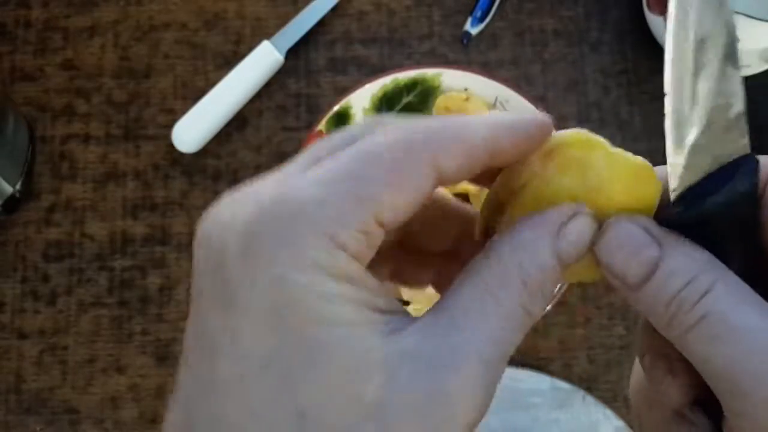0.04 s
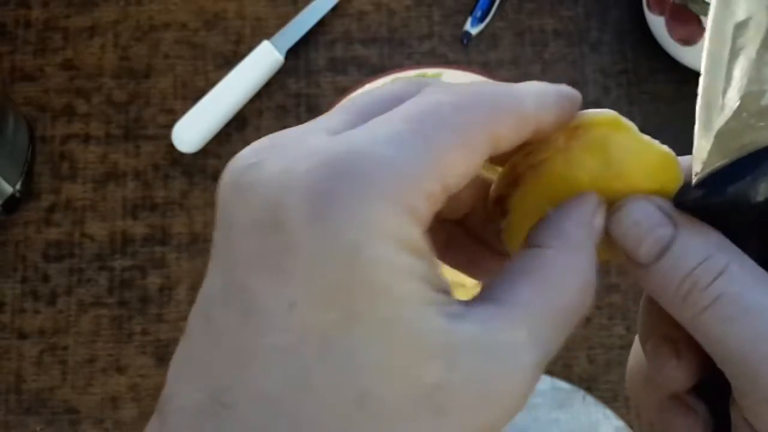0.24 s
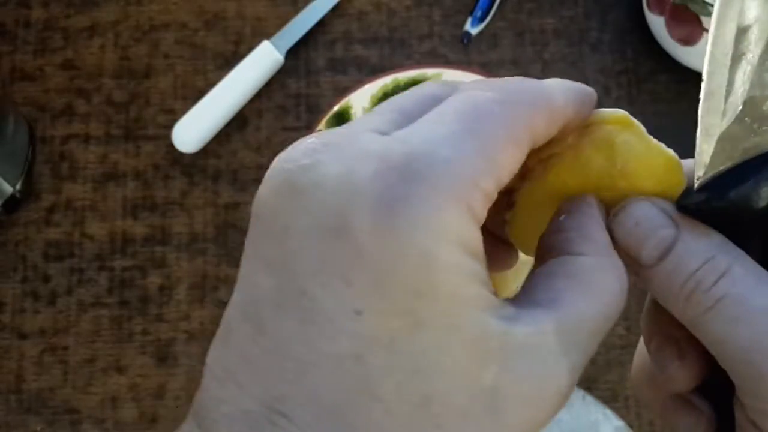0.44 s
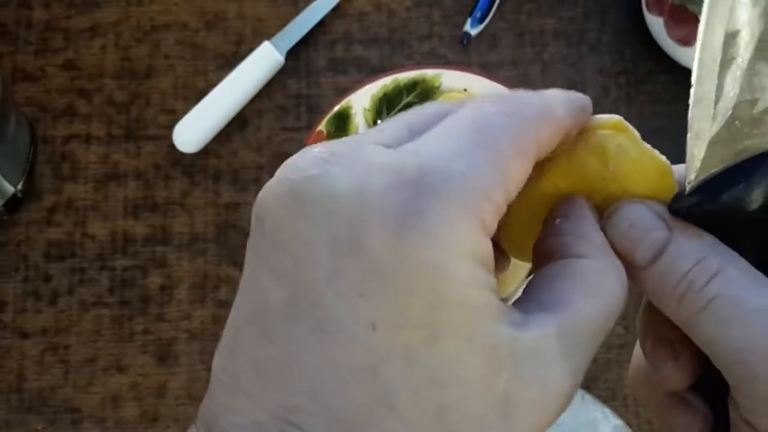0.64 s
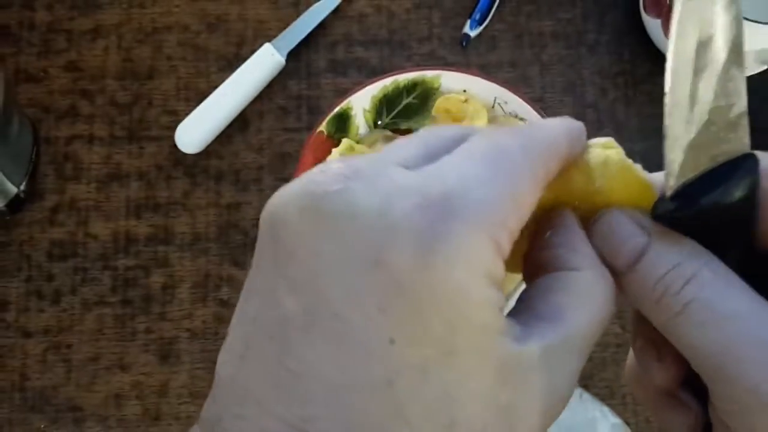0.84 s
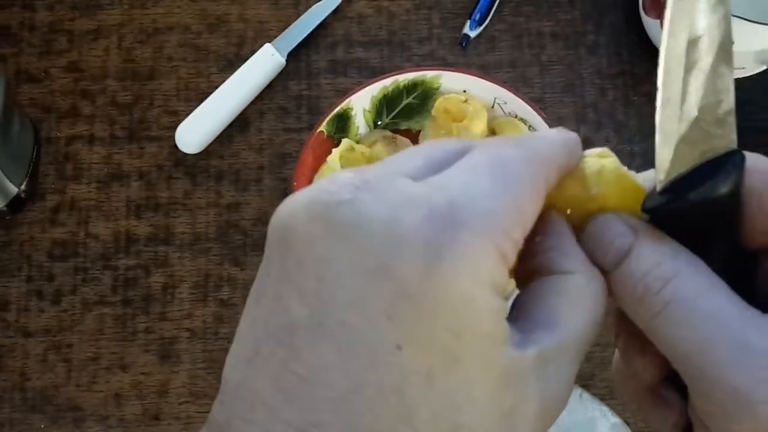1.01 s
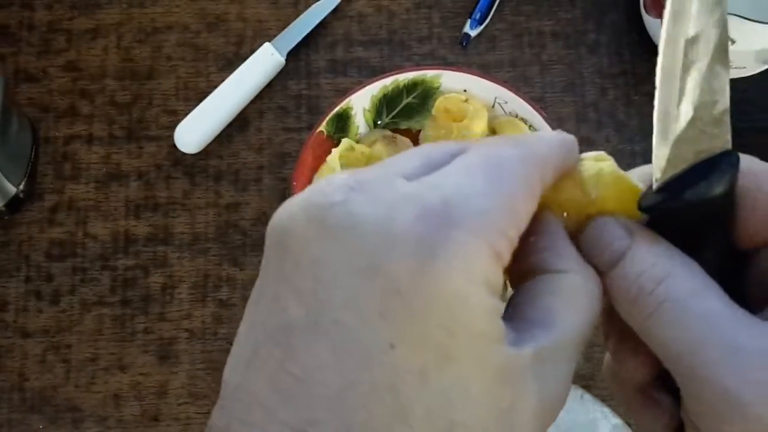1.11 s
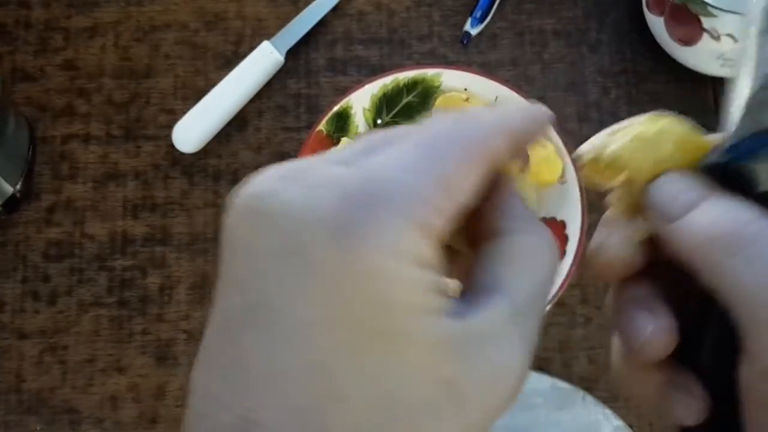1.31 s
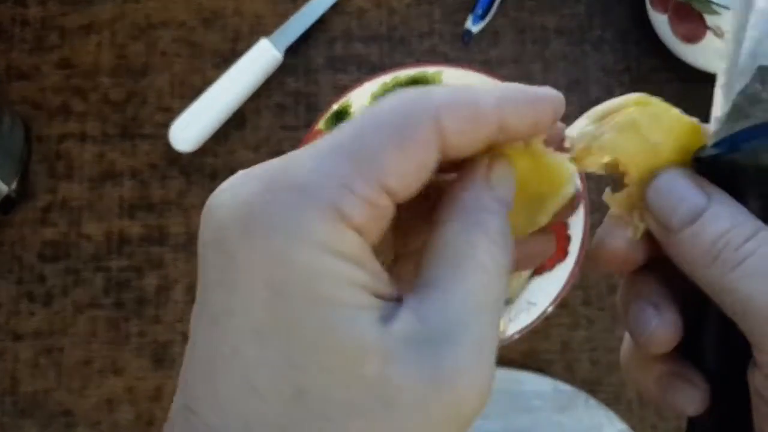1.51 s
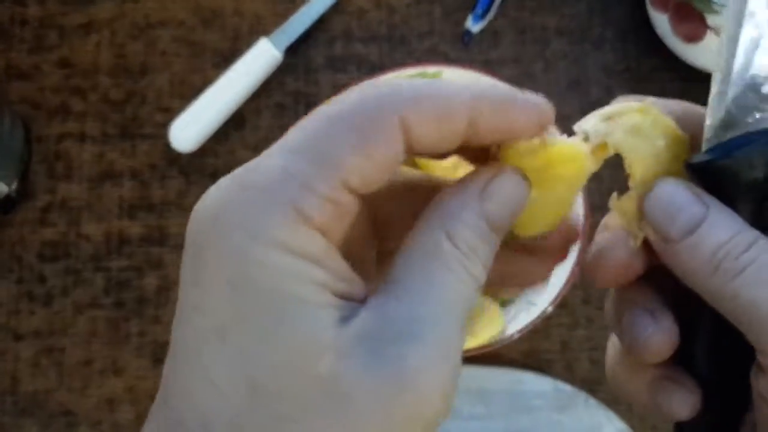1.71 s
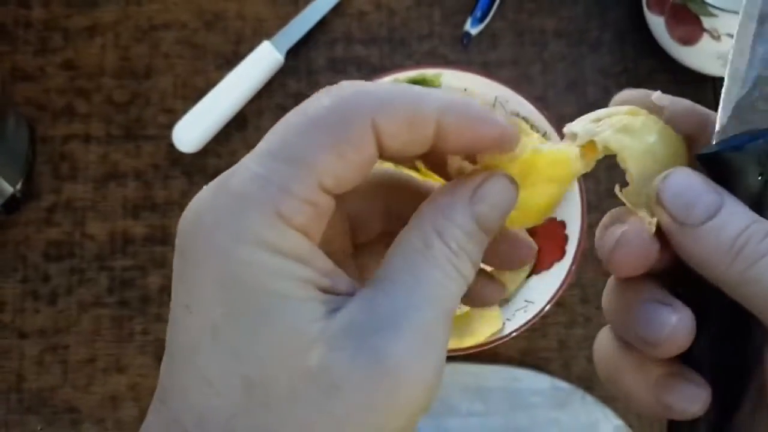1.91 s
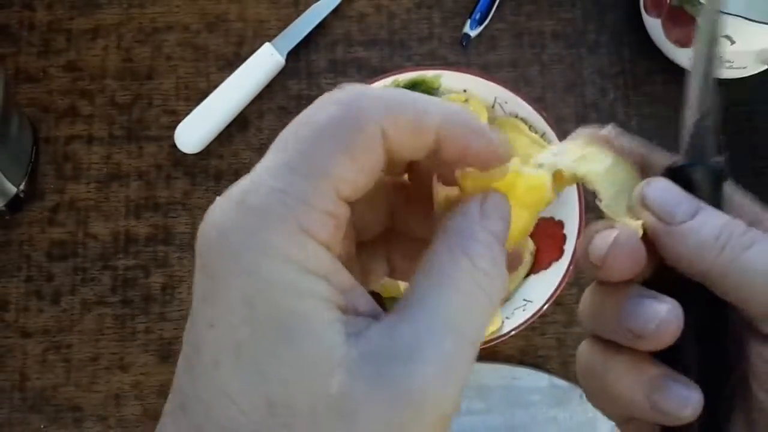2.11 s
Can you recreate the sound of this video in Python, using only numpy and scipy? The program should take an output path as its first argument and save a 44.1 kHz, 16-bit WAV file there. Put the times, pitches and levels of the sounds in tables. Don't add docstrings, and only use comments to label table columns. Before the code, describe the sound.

Close, dry crunching of a hard fried chip pulled apart in the fingers at a table; small snaps quicken into sharp cracks, then fade to faint ticking, with quiet low room hum throughout.

```python
import sys
import numpy as np
from scipy import signal
from scipy.fft import rfft, irfft, next_fast_len
from scipy.io import wavfile

SR = 44100
rng = np.random.default_rng(int(sys.argv[2]) if len(sys.argv) > 2 else 0)


def convert_level_to_amplitude(level_db):
    exponent = np.asarray(level_db, float) / 20
    return 10 ** exponent


def unload_wav(signal):
    wavfile.write(
        sys.argv[1],
        SR,
        np.round(np.clip(np.atleast_2d(signal).T, -1, 1) * 32767).astype(np.int16),
    )


N = 94815

# edge, body, shell, splinter (level [dB])
PART_DB = [-0.56, -1.8, -1.27, 0.01]
PORTS_ALIKE = [.4, 1, 0.57, 0.067]


def unit(x):
    return x / np.sqrt(np.mean(np.abs(x) ** 2) + 1e-20)


def along(points, hz):
    f, v = np.transpose(points)
    return np.interp(np.log(hz + 1), np.log(f + 1), v)


def filtered(x, response):
    m = next_fast_len(N + SR // 2)
    return irfft(rfft(x, m) * response(np.fft.rfftfreq(m, 1 / SR)), m)[..., :N]


def rush(gain_db):
    # (frequency [Hz], correlation [0-1])
    coherence = [(25, 0.8), (70, 1), (180, 0.91), (550, 0.66), (1100, 0.37), (2200, 0.1), (4970, 0.1),
                 (15000, 0.05)]

    def mid_side(hz):
        angle = np.arccos(np.clip(along(coherence, hz), -1, 1)) / 2
        return convert_level_to_amplitude(gain_db(hz)) * [np.cos(angle), np.sin(angle)]

    mid, side = filtered(rng.standard_normal((2, N)), mid_side)
    return unit(np.array([mid + side, mid - side]))


def room_tone():
    hum_db, hiss_db = -45.5, -62.5
    # (frequency [Hz], density [dB per Hz])
    hum_spectrum = [(15, -56), (25, -30.5), (129, -2), (220, -9), (266, -10.5), (368, -11.5), (460, -15.5),
                    (852, -13.5), (1500, -18.5), (1950, -53), (3300, -120)]
    # (frequency [Hz], width [Hz], lift [dB])
    modes = [(84.6, 21, 11), (133, 8.6, 9.5), (286, 21, 7), (391.4, 109, 8.5), (862, 63, 4.5)]
    # (frequency [Hz], density [dB per Hz])
    hiss_spectrum = [(710, -14.5), (1200, -11), (1840, -6.5), (2420, -16), (2980, -13.5), (3600, -33),
                     (6000, -43), (10400, -26), (14800, -30), (16500, -50)]

    def hum_gain(hz):
        lift = sum(db / (1 + (2 * (hz - c) / w) ** 2) for c, w, db in modes)
        return along(hum_spectrum, hz) + lift

    hum = rush(hum_gain)
    hiss = rush(lambda hz: along(hiss_spectrum, hz))
    return convert_level_to_amplitude(hum_db) * hum + convert_level_to_amplitude(hiss_db) * hiss


def room(x):
    gap_s, step = 0.0032, SR // 8
    # (frequency [Hz], fall by 60 dB [s])
    decay_t60 = [(500, 0.046), (2500, 0.33), (8000, 0.36), (15000, 0.27)]
    out = np.zeros((2, N + 2 * SR))
    for a in range(0, N, step):
        hz, t, z = signal.stft(rng.standard_normal((2, SR // 3)), SR, nperseg=256)
        decay = convert_level_to_amplitude(-60 * t / along(decay_t60, hz)[:, None])
        tail = signal.istft(z * decay, SR, nperseg=256)[1]
        wet = signal.fftconvolve(x[None, a:a + step], tail / np.linalg.norm(tail[0]), axes=1)
        b = a + round(gap_s * SR)
        out[:, b:b + wet.shape[1]] += wet
    return out[:, :N]


def table_echo(x):
    delay_s, echo_db = 0.0027, -12
    delayed = np.pad(x[::-1], ((0, 0), (round(delay_s * SR), 0)))
    return convert_level_to_amplitude(echo_db) * delayed[:, :N]


def resonant(x, peaks):
    def one(f, c, w):
        return 1j * f * w / (c * c - f * f + 1j * f * w)

    def response(f):
        total = 0
        for k, (c, w, db) in enumerate(peaks):
            sign = (-1) ** k
            total = total + sign * convert_level_to_amplitude(db) * one(f, c, w) * one(f, c, 2 * w)
        return unit(total)

    return filtered(x, response)


def chip(shocks):
    # (frequency [Hz], width [Hz], level [dB])
    edge = [(8420, 1910, 2), (10110, 1360, -1.5)]
    # (frequency [Hz], width [Hz], level [dB])
    body = [(990, 195, -7.5), (1672, 520, -2.5), (2640, 580, 1.5)]
    # (frequency [Hz], width [Hz], level [dB])
    shell = [(3490, 1570, -3), (4700, 2450, 1.5)]
    # (frequency [Hz], width [Hz], level [dB])
    splinter = [(10960, 2400, 4), (14960, 3000, -2.5)]
    return sum(resonant(x, part) for x, part in zip(shocks, (edge, body, shell, splinter)))


def paired(alike, size):
    share = np.array(alike)[:, None, None]
    common = rng.standard_normal((4, 1, size))
    private = rng.standard_normal((4, 2, size))
    return np.sqrt(share) * common + np.sqrt(1 - share) * private


def flakes():
    cycles, size = 38, 3000
    wobble_rad, left_lead_rad = 0.027, 0.4
    # (time [s], pitch [Hz], level [dB])
    loose_flakes = [(0.2508, 1430, -31), (0.285, 1480, -33), (0.295, 1480, -31), (0.293, 2730, -50),
                    (0.3285, 5350, -50), (0.328, 2490, -40), (0.376, 2300, -33), (0.5324, 4350, -32),
                    (0.581, 4800, -25.5), (0.6296, 2510, -25), (0.7553, 2820, -29.5), (0.7925, 1566, -24),
                    (0.7924, 890, -40), (0.7914, 2930, -45), (0.794, 4300, -38), (0.8654, 2830, -21),
                    (0.8654, 2433, -26), (0.9053, 3440, -20), (0.906, 1460, -27.5), (1.0383, 3680, -22),
                    (1.1239, 2850, -38), (1.121, 1750, -33.5), (1.217, 4450, -34), (1.244, 4430, -38),
                    (1.3062, 4700, -28), (1.3039, 2870, -27.5), (1.303, 1560, -37), (1.331, 4130, -32),
                    (1.331, 3020, -25), (1.432, 4672, -42), (1.654, 1227, -38.5), (1.9226, 2170, -44)]
    out, t = np.zeros((2, N + size)), np.arange(size) / SR
    for s, hz, db in loose_flakes:
        phase = np.cumsum(wobble_rad * rng.standard_normal(size)) + [[left_lead_rad], [0]]
        envelope = convert_level_to_amplitude(db - 60 * t * hz / cycles)
        start = round(s * SR)
        out[:, start:start + size] += envelope * np.sin(2 * np.pi * hz * t + phase)
    return out[:, :N]


def crackle(rows):
    shower_db, shower_t60_s = -8.5, 0.071
    cracks_per_s, spread_db, crack_s = 2600, 2.5, 0.0006
    looser = 0.78
    # (time [s], level [dB])
    pressure = [(0.0, -55.5), (0.19, -76), (0.25, -30), (0.4, -37), (0.45, -47), (0.65, -36), (0.87, -42.5),
                (1.04, -37), (1.19, -43), (1.262, -67), (1.42, -47.5), (2.03, -58.5), (2.15, -58)]
    # edge, body, shell, splinter (level [dB])
    press_db = [-8.5, -19, -19.5, -12.5]
    t = np.arange(N) / SR
    power = np.zeros((4, N))
    for s, db, *shares in rows:
        power[:, round(s * SR)] += convert_level_to_amplitude(db + shower_db + np.add([0, *shares], PART_DB)) ** 2
    decay = convert_level_to_amplitude(-120 * t[None, :SR // 3] / shower_t60_s)
    power = np.abs(signal.fftconvolve(power, decay, axes=1)[:, :N])
    s, db = np.transpose(pressure)
    power += convert_level_to_amplitude(np.interp(t, s, db) + np.array(press_db)[:, None]) ** 2

    happens = rng.random(N) < cracks_per_s / SR
    sizes = happens * convert_level_to_amplitude(spread_db * np.minimum(rng.exponential(1, N), 3))
    cracks = unit(signal.lfilter([1], [1, -np.exp(-1 / (crack_s * SR))], sizes))
    noise = paired(looser * np.array(PORTS_ALIKE), size=N)
    return chip((np.sqrt(power) * cracks)[:, None] * noise)


def snaps(rows):
    snap_db, snap_t60_s, pan_db, size = 16, 0.0035, 1.5, 512
    clean_share = 0.75
    t = np.arange(size) / SR
    shocks = np.zeros((4, 2, N + size))
    for s, db, *shares in rows:
        burst = paired(PORTS_ALIKE, size=size) * convert_level_to_amplitude(-60 * t / snap_t60_s)
        burst /= np.linalg.norm(burst, axis=2, keepdims=True)
        burst *= np.sqrt(1 - clean_share)
        burst[:, [0, 1], [0, rng.integers(0, 2)]] += np.sqrt(clean_share)
        level = convert_level_to_amplitude(db + snap_db + np.add([0, *shares], PART_DB))
        pan = convert_level_to_amplitude(rng.normal(0, pan_db) * np.array([0.5, -0.5]))
        gain = level[:, None] * pan
        start = round(s * SR)
        shocks[..., start:start + size] += burst * gain[..., None]
    return chip(shocks[..., :N])


def scene():
    room_db, left_db = -2.5, 0.63
    # (time [s], edge level [dB], body [dB], shell [dB], splinter [dB])
    bending = [(0.0009, -59.5, 18.5, -13, -9), (0.1127, -46.5, -14, -31, 2), (0.1382, -46.5, -22, -9, 8),
               (0.1701, -48.5, -8, -16, 2), (0.2265, -57, 3, -20, 3), (0.2318, -34, -21, -13, 8),
               (0.2373, -29, -7, -25, -16), (0.2497, -22.5, -15, -26, 3), (0.2551, -23.5, -15, -17, 3.5),
               (0.2738, -29.5, -8.5, -14, 0), (0.284, -28, -2, -9, 6.5), (0.2943, -22, -7.5, -8, -2),
               (0.3285, -25.5, 0.5, 8.5, 4), (0.3757, -36, 2.5, 5.5, 5.5), (0.4183, -32, -6, -8, -4),
               (0.4227, -17.5, -19.5, -10.5, -3), (0.4771, -32.5, -30, -11, 6.5),
               (0.5319, -28.5, -8, -4, -1), (0.5512, -37.5, -26, -21, 11), (0.58, -27, -14.5, 0.5, -1),
               (0.598, -37.5, -14, -17, 13), (0.6296, -23, -8.5, -9, -5.5), (0.6415, -21, -6.5, -3.5, -3),
               (0.6899, -35.5, -6, -1.5, 1), (0.7427, -53, -14, -17, -10), (0.7541, -25.5, -8, -9, -1)]
    # (time [s], edge level [dB], body [dB], shell [dB], splinter [dB])
    breaking = [(0.7915, -24, -2, -1.5, -3.5), (0.8181, -29.5, -4, -21, 1), (0.8543, -31, -10, -1, -8),
                (0.861, -30, -16, -8, -2), (0.8654, -18, -9, -11, -6), (0.874, -32, -21, 8, -12),
                (0.9055, -15.5, -7, -10, -2.5), (0.9098, -10.5, -39, -14.5, -3.5),
                (0.9075, -20, -16, -17, -20), (0.918, -19.5, -29, -9, -11), (0.9262, -20, -24, -3, -5),
                (0.9353, -18.5, -20, -7.5, -15), (0.9409, -22, -14, 3.5, 5), (1.0157, -26, -16, -6, 2),
                (1.0302, -21, -14.5, -3, 6), (1.0383, -21, -30, -6, -15), (1.0505, -49, -12, -13, 27),
                (1.0779, -21.5, -43, -11, -0.5), (1.0757, -28, -37, -12, 4.5), (1.1218, -17, -12, -7.5, -1),
                (1.1263, -26, -28, -12, -7), (1.131, -13, -29, -15, -4.5), (1.2046, -24.5, -20, -4, 1),
                (1.2067, -23.5, -13, -3.5, 2), (1.2191, -22, -14.5, -8.5, -5), (1.2457, -27, -16, -0.5, -3),
                (1.256, -19, -26, -14, -5), (1.2878, -34, -27, -23, -4), (1.296, -24, -17, -9, 3),
                (1.3043, -12.5, -22, -6, -9.5), (1.3147, -25, -32, -26, -7), (1.3248, -17, -17.5, -6.5, -2)]
    # (time [s], edge level [dB], body [dB], shell [dB], splinter [dB])
    crumbs = [(1.3267, -19, -11, -10, -13), (1.332, -14, -18, -9.5, -13), (1.34, -36, -28, -20, -7),
              (1.3598, -18.5, -11.5, -13.5, -7), (1.3653, -24, -13, -3, -2), (1.3936, -35.5, -11, -9, 4),
              (1.429, -34.5, -31, 1, -0.5), (1.5182, -34, -12, -8.5, -1), (1.523, -42.5, -6, -4, -10),
              (1.5619, -36, -15, -19, -13), (1.5663, -40.5, -20, -8, -3), (1.5734, -45, -20, -11, -6),
              (1.5677, -41, -29, -10, -4), (1.6138, -42, -4, -12, -2), (1.6209, -40, -15, -7, 0),
              (1.626, -37.5, -21, -17, -13), (1.6397, -43, -20, -15, -8), (1.6474, -44, -25, -17, -6),
              (1.654, -36.5, -9.5, -5.5, 0), (1.7125, -37.5, -7, -14, 5), (1.7204, -37.5, -17, -7, 3),
              (1.7473, -38, -29, -19, -12), (1.7613, -43, -20, -7, -15), (1.863, -43, -16, -14.5, -17),
              (1.9221, -53, 13, -14, -7), (1.927, -35, -25, -16, -12), (1.9748, -48.5, -17, -7, -2),
              (2.0007, -51.5, -1, -15, -6), (2.0468, -34.5, -34, -13.5, -9), (2.0971, -50.5, -10, -4, 1)]
    rows = [*bending, *breaking, *crumbs]
    breaks = snaps(rows) + flakes()
    near = breaks + crackle(rows)
    reverberant = convert_level_to_amplitude(room_db) * room(near.mean(0))
    mix = near + table_echo(breaks) + reverberant + room_tone()
    return mix * convert_level_to_amplitude([[left_db], [-left_db]])


def band_limit(x):
    return signal.sosfilt(signal.butter(12, 16980, fs=SR, output="sos"), x)


def record(dry):
    top_hz, spill_db = 15950, -24
    mix = filtered(dry, lambda hz: np.where(hz < top_hz, 1, convert_level_to_amplitude(spill_db)))
    return band_limit(mix)


dry = scene()
out = record(dry)
unload_wav(out)
```